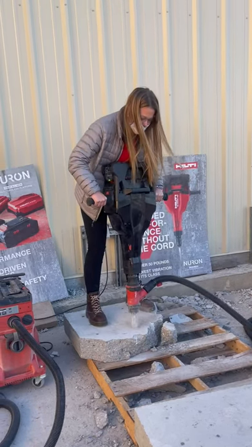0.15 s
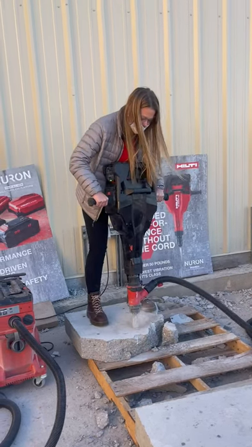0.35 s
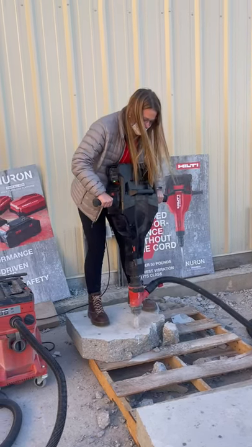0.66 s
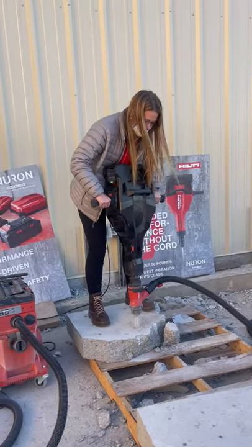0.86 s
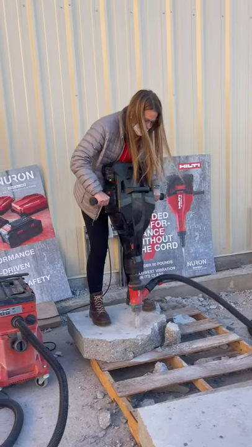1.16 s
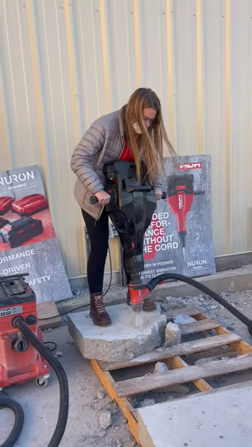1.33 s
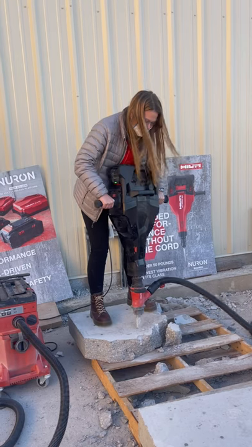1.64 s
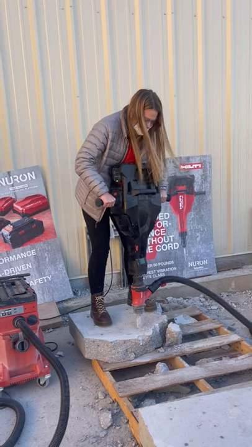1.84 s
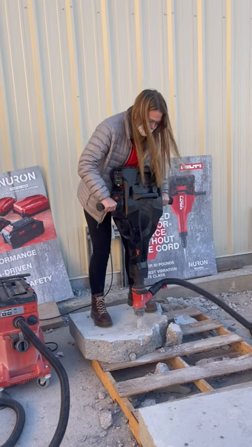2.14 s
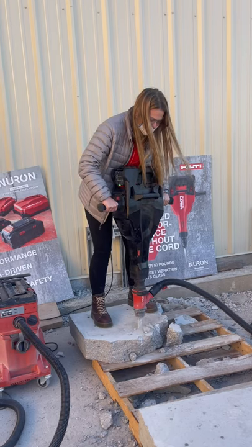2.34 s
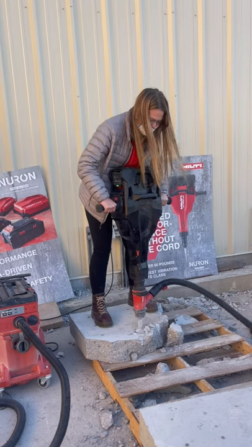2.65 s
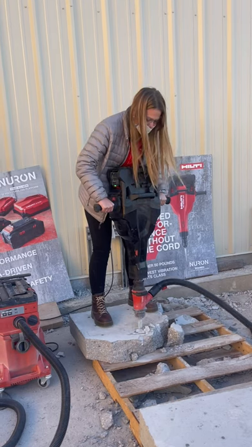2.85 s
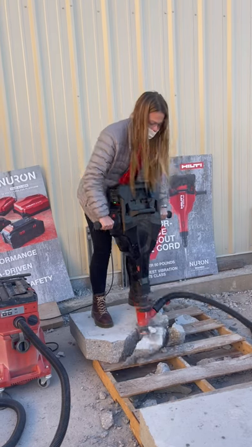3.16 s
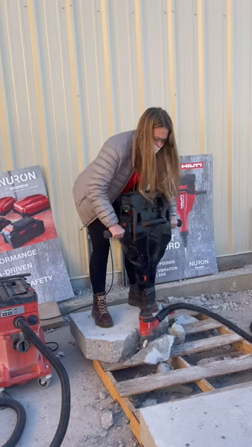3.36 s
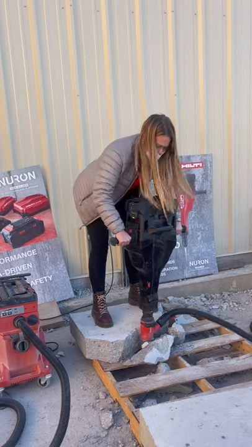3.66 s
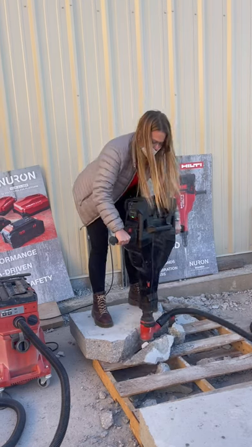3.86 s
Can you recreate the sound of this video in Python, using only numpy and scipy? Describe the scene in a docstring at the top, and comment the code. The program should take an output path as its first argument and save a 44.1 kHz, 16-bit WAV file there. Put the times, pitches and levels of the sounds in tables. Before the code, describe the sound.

Rapid jackhammer blows chip a concrete slab, then stop as it cracks and the motor whines on.

```python
"""An electric demolition hammer pounds a concrete slab thirty times a second beside a sheet-metal wall.
Each blow knocks the tool and the slab, crunches grit and rings the steel chisel; chips crack off.
After three seconds the slab breaks, a chunk drops and the blows stop.
The motor whines on over the rush of a dust extractor."""
import sys
import numpy as np
from scipy import signal
from scipy.fft import rfft, irfft
from scipy.io import wavfile

SR = 44100
rng = np.random.default_rng(int(sys.argv[2]) if len(sys.argv) > 2 else 0)


def generate_wav(sig):
    """Save sig (samples, or channels by samples) to the path in sys.argv[1] as 16-bit PCM at SR."""
    pcm = np.round(np.clip(np.atleast_2d(sig).T, -1, 1) * 32767).astype(np.int16)
    wavfile.write(sys.argv[1], SR, pcm)


N = 176400
T = np.arange(N) / SR
RING_T = np.arange(6000) / SR  # seconds since one hit


def amp(db):
    """Turns decibels into a gain."""
    return 10 ** (np.asarray(db) / 20)


def curve(rows, s, column=1):
    """Reads one column of a table over time."""
    rows = np.array(rows, float)
    return np.interp(s, rows[:, 0], rows[:, column])


def spectrum(points, size):
    """Reads a table over log frequency at the bins of an FFT."""
    hz, value = np.transpose(points)
    return np.interp(np.log(np.fft.rfftfreq(size, 1 / SR) + 1), np.log(hz), value)


def noise(colour, size, grain_db=0):
    """Coloured noise of rms 1, smooth or in sharp grains."""
    grains = amp(grain_db * np.repeat(rng.standard_normal(size // 20), 20))
    white = rng.standard_normal(size) * grains
    x = irfft(rfft(white) * amp(spectrum(colour, size)), size)
    return x / np.sqrt(np.mean(x ** 2) + 1e-20)


def drift(span_s):
    """A random wander that finds a new value every span."""
    return np.interp(T / span_s, np.arange(4000), rng.standard_normal(4000))


def add(mix, s, sound):
    """Mixes a sound in at a time in seconds."""
    part = mix[max(round(s * SR), 0):][:len(sound)]
    part += sound[:len(part)]


def delayed(x, ms):
    """The sound, a little later."""
    hz = np.fft.rfftfreq(2 * N, 1 / SR)
    return irfft(rfft(x, 2 * N) * np.exp(-2j * np.pi * hz * ms / 1000))[:N]


def per_blow(x):
    """Scales one blow so that thirty a second have rms 1."""
    return x * np.sqrt(SR / 30 / np.sum(x ** 2))


def knocks(times, modes, levels_db, rise_s, scatter_db, detune):
    """Every blow rings the same fading tones, a little differently."""
    hz, db, t60, *lag_ms = np.transpose(modes)[:, :, None]
    t = np.maximum(RING_T - sum(lag_ms) / 1000, 0)
    shape = amp(db - 60 * t / t60) * (1 - np.exp(-t / rise_s)) ** 2  # t60: time to fade by 60 dB
    out = np.zeros(N)
    for s, level in zip(times, levels_db):
        louder, sharper = rng.standard_normal((2, len(modes), 1))
        ring = shape * amp(scatter_db * louder) * np.sin(2 * np.pi * hz * (1 + detune * sharper) * t)
        add(out, s, amp(level + .5 * scatter_db * rng.standard_normal()) * per_blow(ring.sum(0)))
    return out


def burst(colour, t60_s, grain_db, rise_s=0.00016):
    """Concrete cracks: grainy noise that starts sharply and fades."""
    fading = noise(colour, len(RING_T), grain_db) * amp(-60 * RING_T / t60_s)
    return fading * (1 - np.exp(-RING_T / rise_s))


def crush(times, colour, levels_db, t60_s, grain_db):
    """One gritty burst at each blow, now short, now long."""
    out = np.zeros(N)
    for s, level in zip(times, levels_db):
        crack = burst(colour, t60_s * np.exp(.3 * rng.standard_normal()), grain_db)
        add(out, s, amp(level + 1.43 * rng.standard_normal()) * per_blow(crack))
    return out


# How fast the hammer strikes. Each row: time in seconds, blows per second.
BLOW_RATE = [(0, 27.86), (0.1, 28.265), (0.7, 29.481), (0.9, 29.302), (1, 30.697), (1.1, 30.271),
             (1.2, 27.821), (1.25, 30.306), (1.3, 25.761), (1.38, 38.38), (1.42, 30.372), (1.8, 30.086),
             (1.9, 30.497), (2.5, 30.376), (2.8, 31.059), (3.1, 30.032)]
LAST_BLOW_S = 3.19


def blow_times(jitter_s=.00015):
    """One blow for each turn of the crank, slightly uneven."""
    turns = .06 + np.cumsum(curve(BLOW_RATE, T)) / SR
    times = np.interp(np.arange(np.interp(LAST_BLOW_S, T, turns)), turns, T)
    return times + jitter_s * rng.standard_normal(len(times))


# How hard the blows knock. Each row: time in seconds, relative slab and housing levels in dB.
KNOCK_LEVELS = [(0.0, -25, -28.5), (0.27, -28, -33.5), (0.44, -26.3, -28), (0.75, -26.2, -32),
                (0.95, -26.5, -26.5), (1.27, -27.5, -29.5), (1.34, -33, -35.5), (1.44, -25.5, -28),
                (1.9, -26, -27), (2.1, -26.5, -31), (2.6, -26, -29.5), (2.85, -26.5, -34.5),
                (3.03, -32, -42.5), (3.08, -65, -48), (3.2, -39, -59)]
# The tones of the slab and of the tool's housing.
# Each row: pitch in Hz, relative level in dB, fade time in seconds, lag after the blow in ms.
SLAB_TONES = [(992, -1.5, 0.022, 3), (1132, -4.5, 0.016, 3.5), (1224, -20.5, 0.022, 4),
              (682, -20.5, 0.024, 2), (475, -22.5, 0.034, 0.5)]
HOUSING_TONES = [(2123, 2, 0.02, 0.072), (2319, -1.5, 0.023, 0.318), (1625, -7.5, 0.038, 0.69),
                 (1000, -5, 0.0088, 0.1)]


def slab_and_housing(times):
    """Each blow knocks the slab and the housing, which clatters again as it recoils."""
    slab_db, housing_db = (curve(KNOCK_LEVELS, times, column=k) for k in (1, 2))
    slab = knocks(times, SLAB_TONES, slab_db - 1.03, rise_s=0.0035, scatter_db=1.4, detune=0.0065)
    clank = knocks(times, HOUSING_TONES, housing_db - 4.5, rise_s=0.00022, scatter_db=1.1, detune=0.026)
    recoils = times + .0095 + .002497 * rng.standard_normal(len(times))
    clatter = knocks(recoils, HOUSING_TONES, housing_db - 5,
                     rise_s=0.00022, scatter_db=-0.1, detune=0.012)
    return slab + clank + clatter


# The machine's low tones. Each row: pitch in Hz, relative level in dB, fade time in seconds, lag in ms.
THUD_TONES = [(59, -11.5, 0.079, -0.5), (177, -17, 0.19, -1.1), (231.7, -2, 0.089, 1.9),
              (284, -0.5, 0.061, 2), (331.7, -3, 0.15, 6.5)]
# How heavy the thud is. Each row: time in seconds, relative level in dB.
THUD_LEVEL = [(0, -37.5), (.33, -41.5), (.9, -38), (1.34, -40.5), (1.8, -39.5), (2.85, -41), (3.1, -44),
              (3.2, -46)]


def thud(times):
    """The whole machine thuds with each blow."""
    level_db = curve(THUD_LEVEL, times) - 1.5
    return knocks(times, THUD_TONES, level_db, rise_s=0.0028, scatter_db=0, detune=0.012)


# How loud things are at the chisel's tip.
# Each row: time in seconds, then relative levels in dB of the grit and the main, low and high rings.
TIP_LEVELS = [(0.0, -33.5, -25, -41, -35.5), (0.22, -36, -24, -34, -39), (0.33, -33.5, -28, -35, -24.5),
              (0.44, -37, -27.5, -42.5, -30.5), (0.8, -36, -26.5, -42.5, -32.5), (1.13, -38, -32, -51, -39),
              (1.28, -39.5, -29.5, -37.5, -31), (1.4, -38, -31, -57, -47), (2.1, -37, -30.5, -40, -36),
              (2.25, -35, -31.5, -33, -25), (2.5, -37.5, -32, -36.5, -33), (2.72, -39.5, -31.5, -39.5, -25),
              (2.95, -39, -29.5, -46.5, -52), (3.1, -49, -31.5, -52, -27), (3.19, -46, -45, -50, -51)]
# The chisel's tones. Each row: pitch in Hz, relative level in dB, fade time in seconds.
MAIN_RING = [(7866, -1.5, 0.085), (8376, -9, 0.055)]
LOW_RING = [(5945, -5, 0.053), (6125, -1, 0.03)]
HIGH_RING = [(10700, -6, 0.058), (11550, 2.5, 0.072), (11300, -1, 0.025)]
# The shock runs back up the chisel as a short chirp.
# Each row: pitch in Hz, relative level in dB, fade time in seconds, lag after the blow in ms.
REBOUND = [(9990, 4, 0.0083, 6.1), (11000, 6, 0.0079, 6), (11390, 1, 0.0083, 10)]


def chisel(times):
    """The steel rings at each blow, and again as it bounces in its holder."""
    grit_db, main_db, low_db, high_db = (curve(TIP_LEVELS, times, column=k) for k in range(1, 5))
    choke_db = bite(times)
    main_db += 1 - choke_db
    bounces = times + abs(.0079 + .003 * rng.standard_normal(len(times)))
    steel = knocks(times, MAIN_RING, main_db, rise_s=0.00026, scatter_db=2, detune=0.0026)
    steel += knocks(bounces, MAIN_RING, main_db, rise_s=0.00066, scatter_db=1, detune=0.0019)
    steel += knocks(times, LOW_RING, low_db, rise_s=0.0016, scatter_db=7, detune=0.0066)
    steel += knocks(times, HIGH_RING, high_db - 5 - choke_db,
                    rise_s=0.0003, scatter_db=7.5, detune=0.0035)
    return steel + knocks(times, REBOUND, grit_db + 3, rise_s=0.00032, scatter_db=4, detune=0.015)


# Bright grit and duller crumbling concrete. Each row: frequency in Hz, relative level in dB.
GRIT_COLOUR = [(100, -26), (550, -2), (2500, -8.5), (3800, 4.5), (4800, 1), (6500, 1), (8000, 9.5),
               (9300, 0), (10200, 10.5), (11700, 0), (12500, -22), (16000, -20)]
CRUNCH_COLOUR = [(600, -15), (1450, 5), (2300, -0.5), (3800, -2.5), (5000, -33)]
# How loud the crumbling is. Each row: time in seconds, level in dB.
CRUNCH_LEVEL = [(0, -43.5), (1.8, -36), (2.15, -38.5), (2.6, -40), (2.85, -38.5), (3.1, -49)]


def crushed_concrete(times):
    """Each blow crushes grit, and concrete crumbles as the crack opens."""
    grit_db = curve(TIP_LEVELS, times) + 5.5 - bite(times)
    grit = crush(times, GRIT_COLOUR, grit_db, t60_s=0.062, grain_db=3)
    return grit + crush(times, CRUNCH_COLOUR, curve(CRUNCH_LEVEL, times), t60_s=0.14, grain_db=4)


# Slaps off the ground and the wall. Each row: delay in ms, gain.
ECHOES = [(7.1, 0.19), (10.4, 0.095), (14.3, 0.026), (18.6, 0.18)]


def hammer():
    """All the sounds of the blows; the knocks and the crunching also echo."""
    times = blow_times()
    near = slab_and_housing(times) + thud(times) + crushed_concrete(times)
    return near + chisel(times) + sum(gain * delayed(near, ms) for ms, gain in ECHOES)


def loose_grit():
    """Crumbs dance on the slab for as long as the blows last."""
    running = np.clip((LAST_BLOW_S - T) / .03, 0, 1)
    return noise(GRIT_COLOUR, N, grain_db=1.5) * running * amp(curve(TIP_LEVELS, T) - bite(T))


# The motor's whine. Each row: time in seconds, pitch in Hz, level in dB, level of its octave in dB.
WHINE = [(0, 2925, -55, -60), (3.12, 2995, -53.5, -46.5), (3.24, 3020, -50, -62), (3.29, 3034, -51, -60),
         (3.39, 3010, -43.5, -55), (3.46, 2966, -62, -57), (3.73, 2864, -52, -53.5), (4, 2790, -56.5, -56)]


def motors():
    """The whine and a fainter tone above it sink once the load is gone; the extractor hums on."""
    hz = curve(WHINE, T) * (1 + 0.00239 * drift(span_s=0.0059))
    phase = 2 * np.pi * np.cumsum(hz) / SR
    whine = amp(curve(WHINE, T, column=2)) * (np.sin(phase) + amp(-18) * np.sin(1.4 * phase))
    octave = amp(curve(WHINE, T, column=3)) * np.sin(2 * phase)
    hum = amp(-62.5) * np.sin(2 * np.pi * 577 * T) + amp(-64.5) * np.sin(2 * np.pi * 205 * T)
    return np.sqrt(2) * (whine + octave + hum) * amp(2 * drift(span_s=0.017))


# The colour of the rushing air. Each row: frequency in Hz, relative level in dB.
AIR_COLOUR = [(20, -21), (55, -1), (220, 6), (450, 1.5), (800, 1), (1200, 3.5), (2400, -2.5), (4700, -2.5),
              (5700, -3.5), (7500, -2.5), (9000, -7.5), (11300, 1.5), (12500, -20), (14000, -40)]
# How loud the air is. Each row: time in seconds, level in dB.
AIR_LEVEL = [(0, -38.5), (3.2, -41), (3.55, -47), (3.75, -44), (4, -44.5)]


def air():
    """Air rushes through the extractor and the cooling fan."""
    return noise(AIR_COLOUR, N) * amp(curve(AIR_LEVEL, T) + drift(span_s=0.013))


# Flying chips. Each row: start in seconds, level in dB, fade time in seconds.
CHIPS = [(.141, -15, 0.045), (.210, -19.5, 0.046), (.489, -14.5, 0.024), (.761, -20, 0.022),
         (.796, -15, 0.03), (2.053, -16.5, 0.025), (2.085, -16.5, 0.036), (2.217, -16.5, 0.028),
         (2.612, -14, 0.074), (3.101, -22.5, 0.06), (3.142, -29, .04), (3.175, -32.5, 0.03),
         (3.243, -48, 0.043)]


def chips():
    """Chips crack off and skitter in bright bursts."""
    out = np.zeros(N)
    for s, db, t60 in CHIPS:
        add(out, s, amp(db) * burst(GRIT_COLOUR, t60, grain_db=0.5))
    return out


def bite(times, dip_db=3, length_s=0.04):
    """A blow that frees a chip sinks in, so ring and grit briefly drop by this many dB."""
    since = times[:, None] - np.array(CHIPS)[:, 0] + .003
    return dip_db * ((since > 0) & (since < length_s)).any(axis=1)


# The slab cracks and pieces land. Each row: start in seconds, level in dB, fade time in seconds.
BREAKS = [(3.072, -34, 0.043), (3.1, -28, 0.071), (3.165, -49, 0.068), (3.24, -39, 0.098),
          (3.287, -36.5, 0.091)]
# The colour of the rubble. Each row: frequency in Hz, relative level in dB.
RUBBLE_COLOUR = [(40, -19), (130, -16), (300, 0.5), (1000, -2.5), (2000, -24), (5000, -39.5), (11000, -39),
                 (14000, -53)]


def slab_breaks():
    """Dull bursts as the slab splits and the chunk settles."""
    out = np.zeros(N)
    for s, db, t60 in BREAKS:
        add(out, s, amp(db) * burst(RUBBLE_COLOUR, t60, grain_db=5))
    return out


def yard(x, t60_s, wet_db):
    """A blurred outdoor echo, blended from four quickly swaying tails so its colour stays even."""
    t, out = np.arange(SR // 3) / SR, np.zeros(N)
    for k in range(4):
        tail = rng.standard_normal(len(t)) * amp(-60 * t / t60_s) * np.clip((t - .003) / 0.0018, 0, 1)
        sway_hz = 3.7 + 2.583 * (k // 2)
        share = np.cos(2 * np.pi * sway_hz * T + k * np.pi / 2) / np.sqrt(2)
        out += signal.fftconvolve(x * share, tail / np.linalg.norm(tail))[:N]
    return amp(wet_db) * out


# How far the left side leads the right. Each row: frequency in Hz, lead in radians.
PORT_PHASE = [(50, 0), (800, .3), (1300, -.1), (2400, .4), (3000, 1.4), (4700, 2.2), (5500, 5.7),
              (6600, 6.8), (7850, 8.6), (9200, 9.3), (11550, 11.6), (12300, 14)]
# How much louder the left side is. Each row: frequency in Hz, left minus right in dB.
PORT_BALANCE = [(60, 1.5), (300, 0.5), (650, 7.5), (1000, 10), (1250, 6.5), (1600, -3.5), (1900, 1.5),
                (2300, -4.5), (3000, -2), (4500, 0.5), (12000, 0)]


def ports(x):
    """Two close microphone openings each hear their own phase and level, making stereo."""
    half = np.exp(.5j * spectrum(PORT_PHASE, N)) * amp(.5 * spectrum(PORT_BALANCE, N))
    mean_gain = np.sqrt((abs(half) ** 2 + abs(half) ** -2) / 2)
    return irfft(rfft(x) * np.array([half, 1 / half]) / mean_gain, N)


def scene():
    """The work, with a short bright echo and a longer soft one, over the machines' noise."""
    work = hammer() + loose_grit() + slab_breaks() + chips()
    treble = signal.sosfilt(signal.butter(2, 2000, "high", fs=SR, output="sos"), work)
    front = work + yard(treble, t60_s=0.072, wet_db=-8.5) + motors() + air()
    around = np.array([yard(work, t60_s=0.34, wet_db=-15) + amp(-34) * air() for _ in range(2)])
    return ports(front) + around


def record(dry):
    """The microphone loses the bass below 42 Hz and the treble above 15900 Hz."""
    thin = signal.sosfilt(signal.butter(3, 42, "high", fs=SR, output="sos"), dry)
    low_pass = signal.firwin(511, 15900, window=("kaiser", 9), fs=SR)
    return signal.oaconvolve(thin, low_pass[None], "same")


dry = scene()
out = record(dry)
generate_wav(out)
```